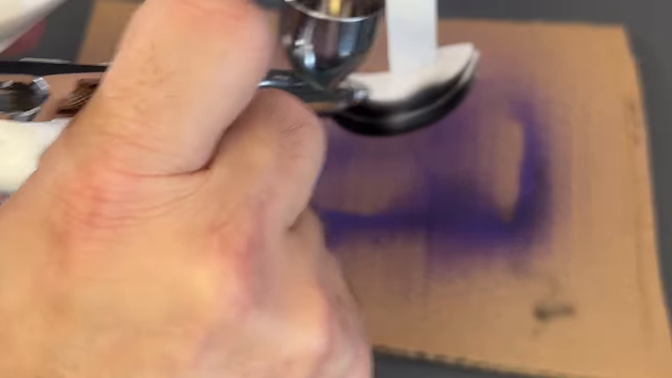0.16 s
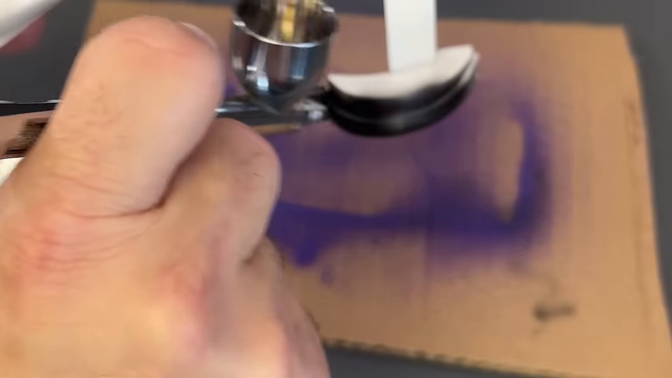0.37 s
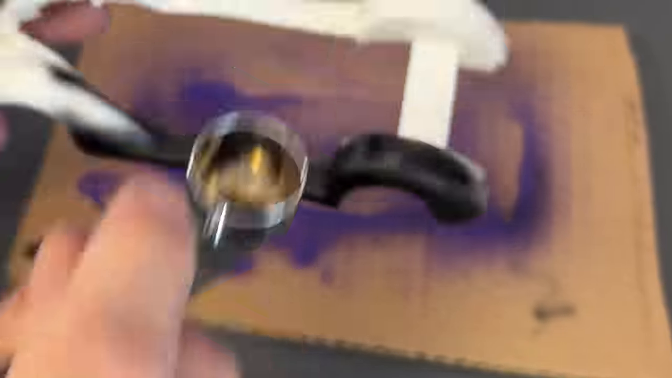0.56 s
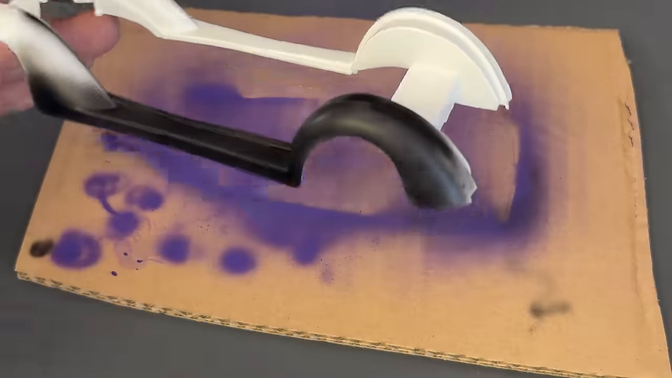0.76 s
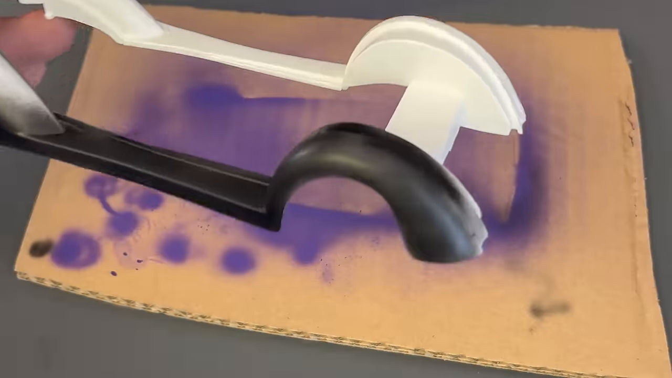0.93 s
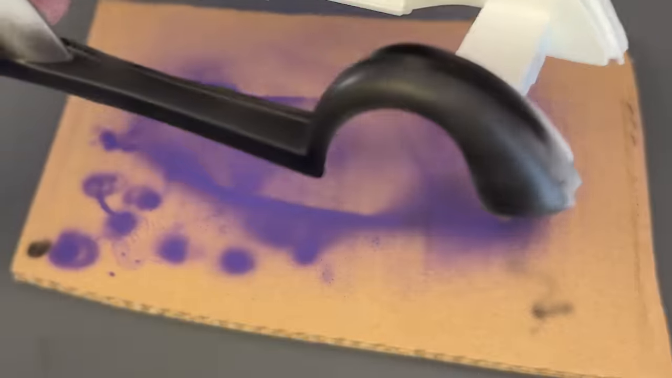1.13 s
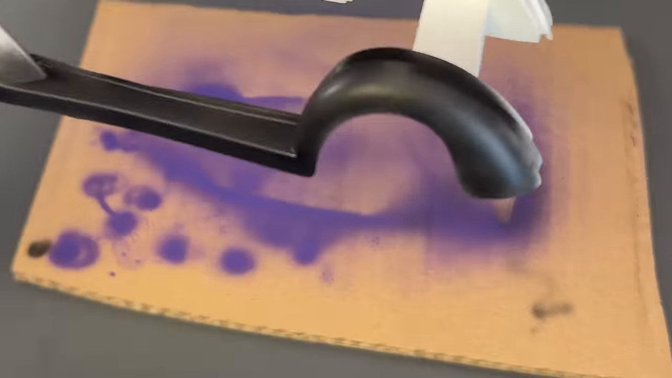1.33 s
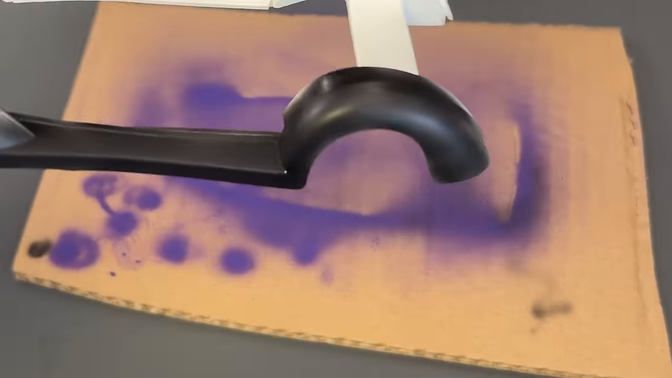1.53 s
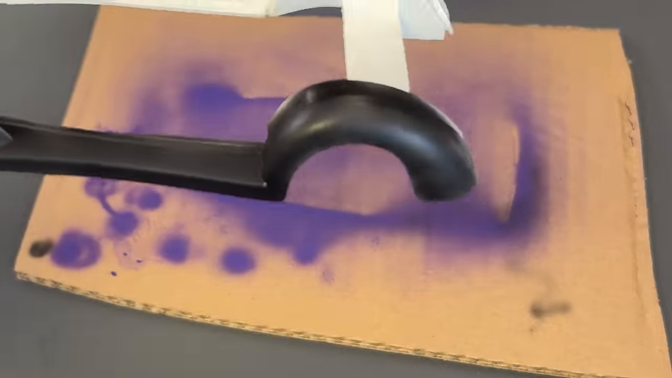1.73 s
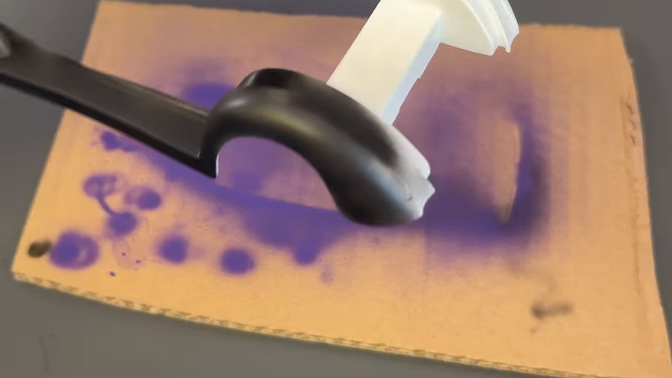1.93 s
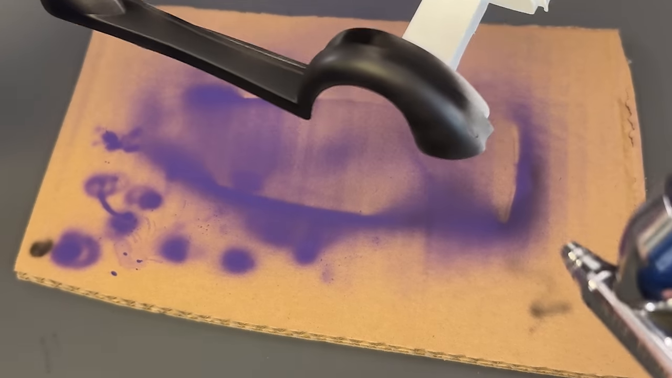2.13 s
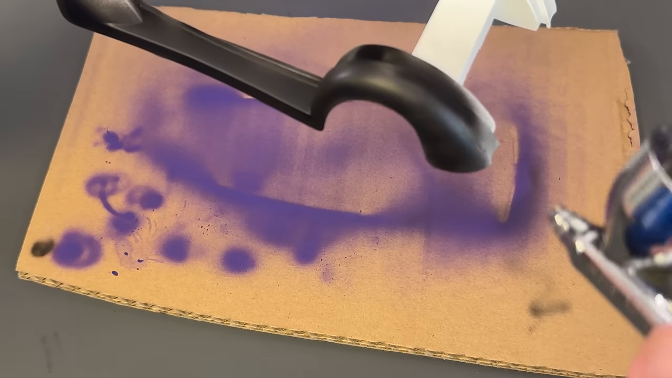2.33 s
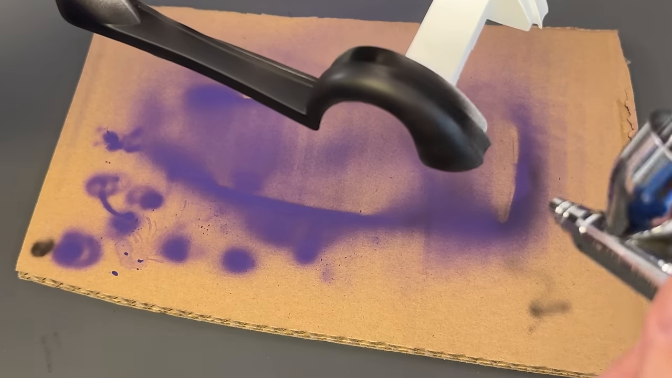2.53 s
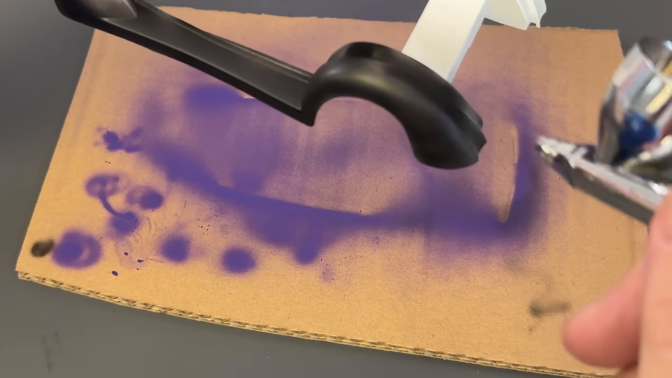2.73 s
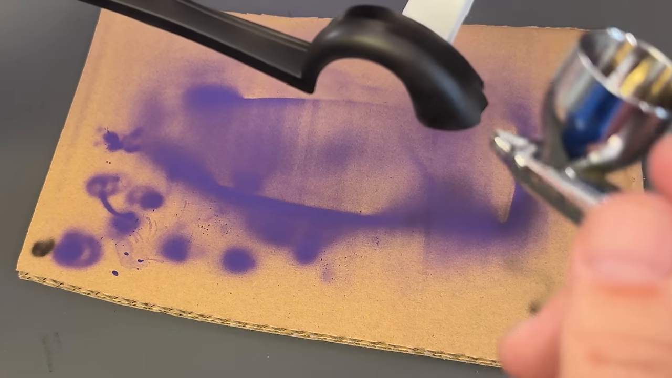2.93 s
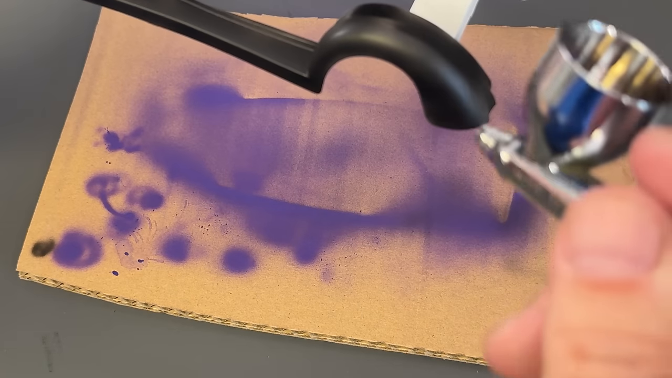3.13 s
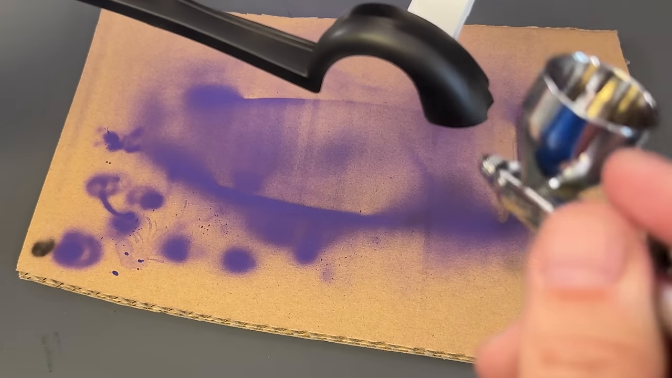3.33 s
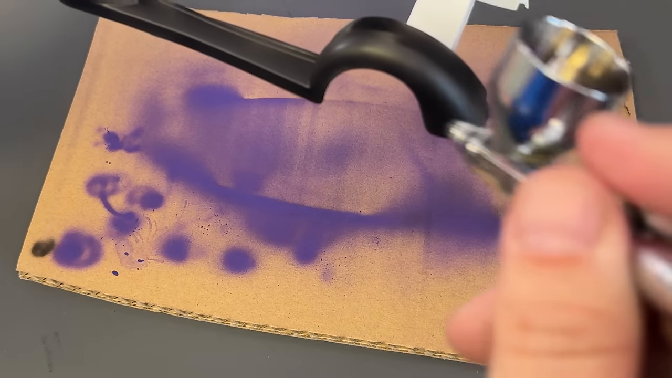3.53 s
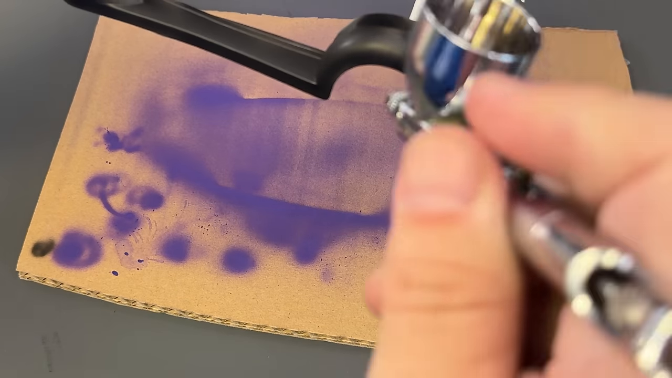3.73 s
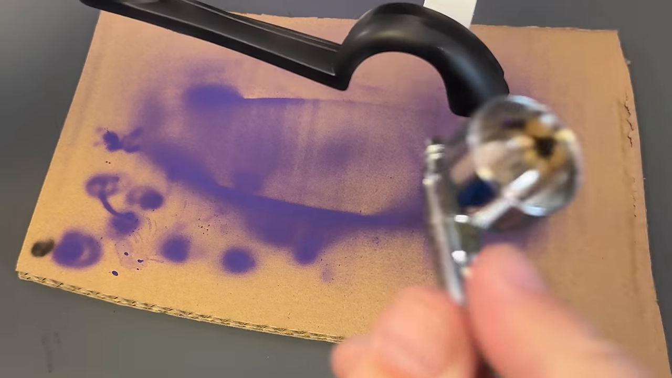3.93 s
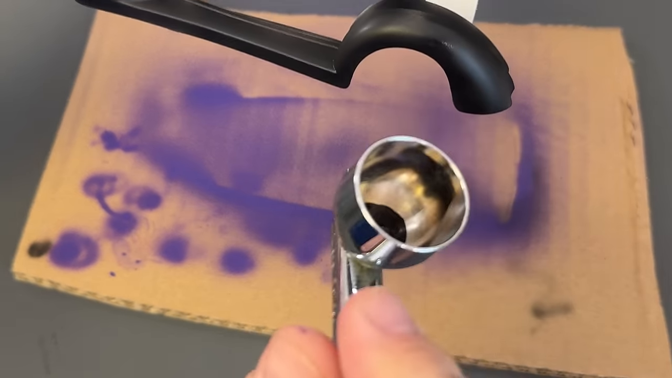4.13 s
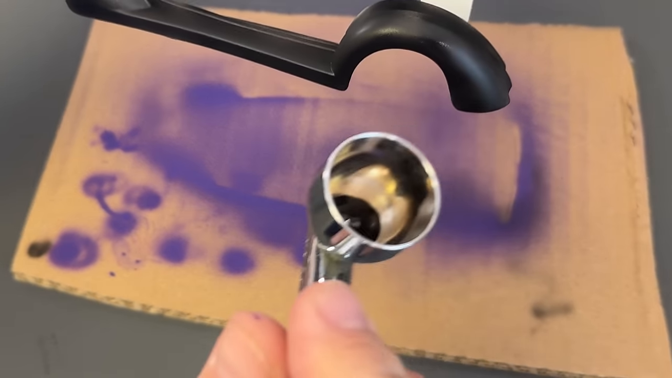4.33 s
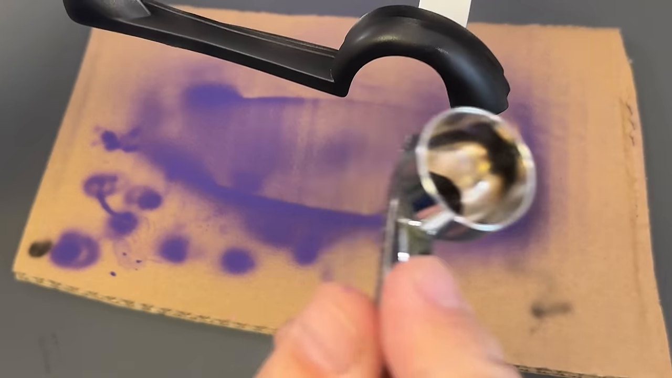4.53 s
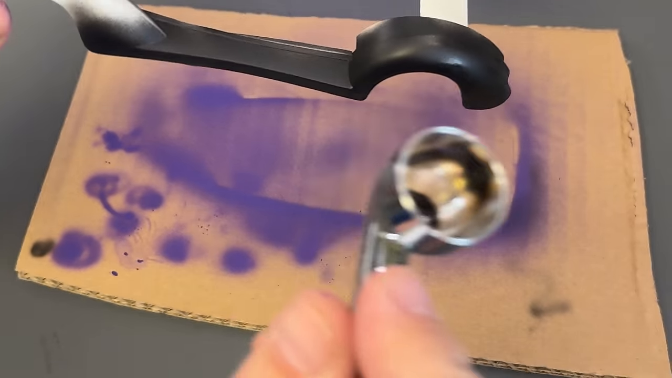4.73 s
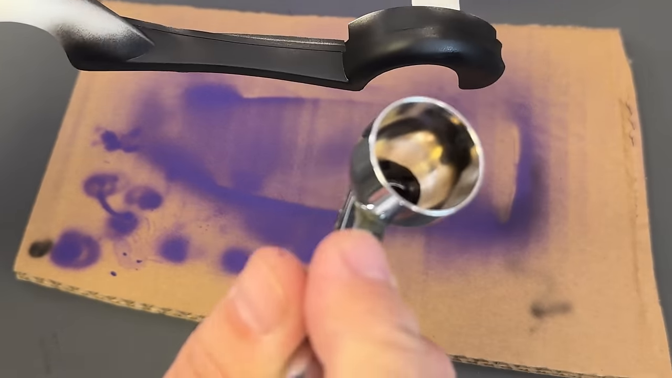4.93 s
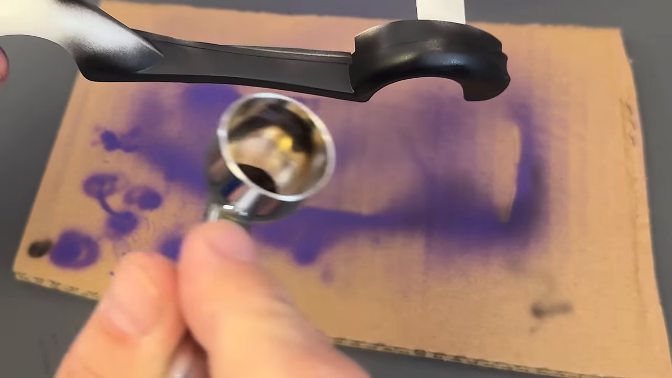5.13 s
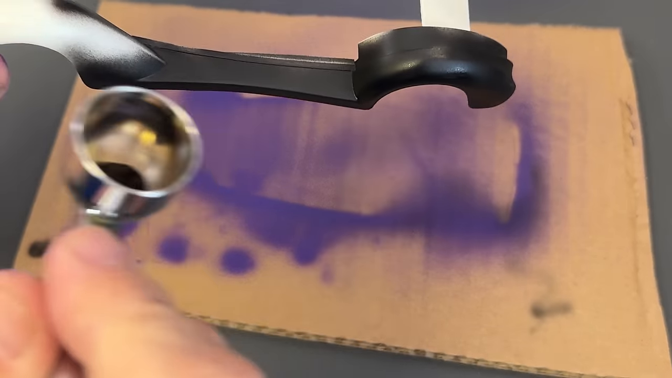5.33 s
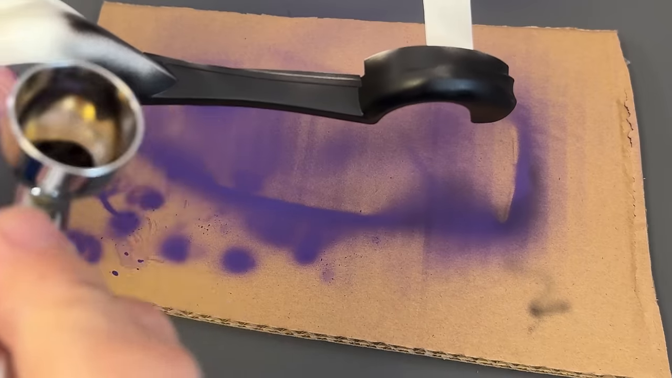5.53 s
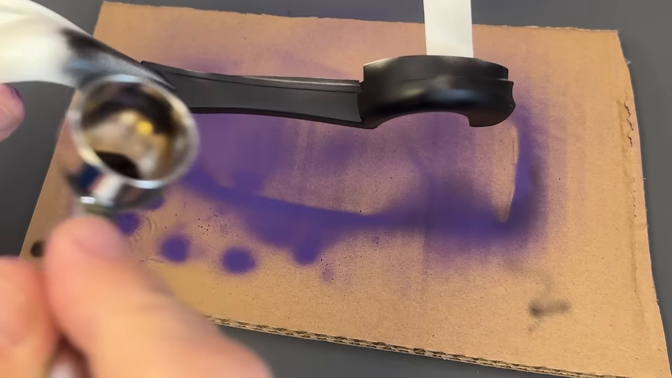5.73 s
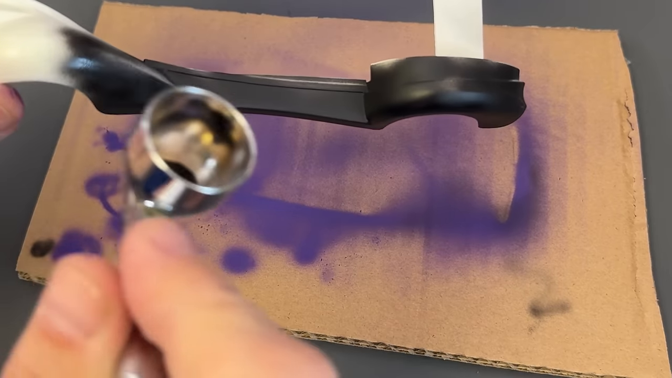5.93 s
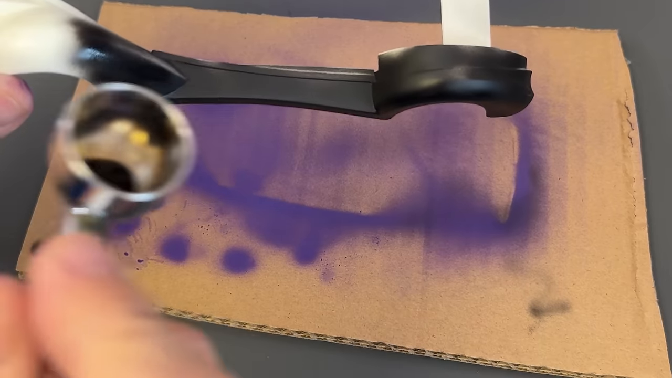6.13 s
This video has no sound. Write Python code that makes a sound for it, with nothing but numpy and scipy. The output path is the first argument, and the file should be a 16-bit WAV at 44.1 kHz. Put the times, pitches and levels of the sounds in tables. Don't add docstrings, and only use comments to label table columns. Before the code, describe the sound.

Two spells of bright, breathy spray hiss on a small plastic part, split by a valve click and a pause of steady motor whine.

```python
import sys
import numpy as np
from scipy import signal
from scipy.fft import rfft, irfft, next_fast_len
from scipy.io import wavfile
from scipy.ndimage import uniform_filter1d

SR = 44100
rng = np.random.default_rng(int(sys.argv[2]) if len(sys.argv) > 2 else 0)


def gain_from_db(level_db):
    decades = np.asarray(level_db, float) / 20
    return 10 ** decades


def transcribe(signal):
    frames = np.atleast_2d(signal).T
    limited = np.clip(frames, -1, 1)
    pcm = np.round(limited * 32767).astype(np.int16)
    wavfile.write(sys.argv[1], SR, pcm)


N = 277389
HZ = np.maximum(np.arange(N // 2 + 1) * SR / N, 1)
PORT_SHARE = 0.63
# f/Hz, side minus mid/dB
BRIGHT_SIDE = [(500, -12), (1200, -13), (2100, -12), (2900, -14), (3600, -9), (4300, -14), (5900, -24),
               (6400, -8.5), (8500, -12), (10300, -11), (10800, -25), (14300, -22), (15000, -9.5),
               (16000, -6)]


def rms_one(x):
    return x / np.sqrt(np.mean(x ** 2) + 1e-20)


def in_time(rows):
    s, *columns = np.transpose(rows)
    return [np.interp(np.arange(N) / SR, s, c) for c in columns]


def at_hz(points, hz):
    point_hz, point_db = np.transpose(points)
    return np.interp(np.log(hz), np.log(point_hz), point_db)


def drift(rate):
    r = np.exp(-80 * np.pi * rate / SR)
    slow = signal.lfilter([1], [1, -2 * r, r * r], rng.standard_normal(N // 40 + 2002))[2000:]
    return np.interp(np.arange(N) / 40, np.arange(len(slow)), rms_one(slow))


def resonate(x, hz, width_hz):
    r = np.exp(-np.pi * width_hz / SR)
    return signal.lfilter([1, 0, -1], [1, -2 * r * np.cos(2 * np.pi * hz / SR), r * r], x)


def noise(spectrum, side_table):
    (first_hz, first_db), (last_hz, last_db) = spectrum[0], spectrum[-1]
    ends = [(first_hz / 2, first_db - 30)] + list(spectrum) + [(last_hz * 2, last_db - 40)]
    colour = gain_from_db(at_hz(ends, HZ)) * [np.ones(len(HZ)), gain_from_db(at_hz(side_table, HZ))]
    mid, apart = rfft(rng.standard_normal((2, N)))
    side = np.sqrt(PORT_SHARE) * 1j * mid + np.sqrt(1 - PORT_SHARE) * apart
    pair = irfft(np.array([mid, side]) * colour, N)
    return pair / np.std(pair[0])


def fan():
    # f/Hz, level/dB
    fan_tones = [(129.0, -64), (166.0, -75), (200.0, -69.5), (238.6, -61), (262.4, -58), (275.0, -66),
                 (325.2, -66), (838.0, -74)]
    # f/Hz, density/dB per Hz
    vent_colour = [(7500, -21), (10300, -7), (10750, 1.5), (11200, -3), (12000, -1), (13000, -9),
                   (13600, -1.5), (16000, -6)]
    now = np.arange(N) / SR
    tones = np.zeros(N)
    for hz, db in fan_tones:
        swell = gain_from_db(db + 2.5 + 1.5 * drift(1.4))
        tones += swell * np.sin(2 * np.pi * hz * now + .6 * drift(1.18))
    hiss = gain_from_db(-72 + 1.2 * drift(3.0)) * noise(vent_colour, BRIGHT_SIDE)
    return tones * [[1], [.07]] + hiss * [[1], [.8]]


def shade(multiple):
    hand_shade = dict([(14, -2.5), (15, 3), (19, 3), (23, -10.5), (27, 3.5), (28, -3.5), (29, -3), (31, 7),
                       (32, 6), (40, -7), (41, 5), (49, 7), (69, 12), (72, -13)])
    if multiple not in hand_shade:
        return 1
    moved = np.interp(np.arange(0, N, 64) / SR, (.9, 1.8), [-.5, .5])
    return np.repeat(gain_from_db(hand_shade[multiple] * moved), 64)[:N]


def motor_multiples():
    chosen = dict([(2, -9), (3, -5.5), (4, -9.5), (6, -12), (7, -14), (9, -11.5), (11, -14), (12, -9),
                   (13, -13.5), (14, -12), (15, -14.5), (16, -23), (18, -16.5), (19, -11.5), (20, -15),
                   (21, -15), (22, -17), (23, -16.5), (25, -19), (27, -23), (28, -19.5), (29, -17),
                   (33, -19), (36, -19), (37, -19), (38, -18), (43, -16), (45, -22), (65, -24), (72, -27),
                   (31, -31), (32, -28), (39, -29), (40, -21), (41, -25), (46, -35), (47, -26), (48, -36),
                   (50, -26), (58, -29), (60, -31), (62, -28), (67, -31), (69, -28), (70, -28), (17, -28),
                   (24, -28), (26, -28), (30, -31), (34, -27), (35, -27), (51, -42), (52, -34), (53, -42),
                   (54, -32), (55, -41), (56, -40), (57, -38), (59, -40)])
    faint_db, fall_db, scatter_db = -22.5, 0.2, 4
    scatter = rng.standard_normal(73)
    return [(k, chosen.get(k, faint_db - fall_db * k + scatter_db * scatter[k])) for k in range(1, 73)]


def compressor():
    # f/Hz, width/Hz, level/dB
    housing = [(91.3, 15, -65), (129.4, 14, -69), (238.7, 5.9, -66.5), (263.4, 10.7, -62.5),
               (1122, 23, -77), (1830, 45, -74.5), (3085, 13, -81), (3430, 40, -91), (4090, 50, -75.5)]
    # f/Hz, density/dB per Hz
    air_colour = [(18, -54), (30, -33), (86, -8), (201, -5.5), (259, -7), (350, -11), (430, -8),
                  (520, -14.5), (600, -10), (670, -17), (747, -11.5), (980, -22.5), (1120, -18),
                  (1350, -24.5), (1930, -30.5), (2710, -22.5), (2890, -32), (4700, -35), (6110, -70),
                  (10300, -120)]
    # f/Hz, side minus mid/dB
    air_side = [(60, -48), (130, -16.5), (290, -14), (640, -7), (1410, 5.5), (3100, 1), (6820, -11),
                (15000, -33)]
    # f/Hz, density/dB per Hz
    upper_air = [(2760, -42), (4700, -17), (5620, 1), (6100, -15), (6660, -9), (6950, -3), (7230, -6),
                 (8010, -17)]
    # t/s, level/dB
    song_level = [(0, -77), (.75, -72), (1.0, -66), (6.29, -62)]
    motor_hz, song_multiple = 62.93, 42
    turn = 2 * np.pi * np.cumsum(motor_hz * (1 + 0.0004 * drift(1.37))) / SR
    waver = [gain_from_db(1.35 * drift(3.2)) for _ in range(7)]
    whine = np.zeros(N)
    for i, (k, db) in enumerate(motor_multiples()):
        tone = np.sin(k * turn + rng.uniform(0, 2 * np.pi))
        whine += gain_from_db(db) * shade(k) * waver[i % 7] * tone
    song = gain_from_db(in_time(song_level)[0]) * np.sqrt(waver[0]) * np.sin(song_multiple * turn)
    body = song * [[1], [-.45]]
    for hz, width_hz, db in housing:
        shake = rng.standard_normal((2, N))
        for _ in range(2):
            shake = resonate(shake, hz, 1.4 * width_hz)
        power = uniform_filter1d(shake ** 2, round(3 * SR / hz), axis=1)
        swell = np.sqrt(power / np.mean(shake ** 2) + .02)
        shake = shake / swell ** .4
        side_gain = gain_from_db(at_hz(air_side, hz) - 3.0)
        body = body + gain_from_db(db) * shade(round(hz / motor_hz)) * rms_one(shake) * [[1], [side_gain]]
    air = gain_from_db(-55.5) * noise(air_colour, air_side)
    air += gain_from_db(-75 + 0.71 * drift(2.7)) * noise(upper_air, BRIGHT_SIDE)
    return gain_from_db(-56) * whine * [[1], [.1]] + body + air


def controls():
    # opens t/s, shuts t/s
    trigger = [
        (-1.0, .539),
        (2.111, 7.0),
    ]
    # t/s, strike level/dB, brightness/dB
    strike = [(0.0, -48.5, 0.5), (0.53, -46.5, -1.2), (2.13, -44.5, 0), (2.18, -62, 3), (2.238, -59, 1),
              (2.258, -44.6, -2), (2.6, -44.5, 3.5), (2.85, -49, 6), (3.05, -44, 4.5), (3.45, -42.0, 4.5),
              (3.85, -37.0, 1), (4.15, -40.5, -0.5), (4.545, -38.5, 0), (4.6, -48, -2.3),
              (4.88, -39.5, -3.5), (5.13, -46.5, 0), (5.5, -43.5, -5), (6.29, -43.5, -0.5)]
    # t/s, change/dB, spread/s, brightness/dB
    crossings = [(0.192, -2.5, 0.023, 5), (0.231, 5.5, 0.026, 0), (0.295, 3, 0.011, -0.2),
                 (0.523, 4.5, 0.0073, -2), (2.273, 0.5, 0.007, 4.5), (2.76, 2.5, 0.011, 1),
                 (2.848, 3, 0.007, 2), (2.911, 3.2, 0.007, 2), (2.951, 4.5, 0.026, -4),
                 (3.031, 0.5, 0.007, 5), (3.139, 6, 0.013, -3.5), (3.291, 5.0, 0.017, -4),
                 (3.458, 5.5, 0.016, -3.5), (3.646, 1, 0.007, 3), (3.877, 3.5, 0.011, -1.5),
                 (4.085, 3, 0.014, -1), (4.252, 1.5, 0.011, -0.1), (4.715, 2, 0.017, -4.5),
                 (4.991, 3, 0.006, -2), (5.04, 1.5, .018, -1.5), (5.294, 4.0, 0.042, -0.5),
                 (5.398, 3.5, 0.014, 2.8), (5.541, 2.5, 0.026, 1.3), (5.893, 0.5, 0.017, 3),
                 (6.22, 3.1, 0.018, 1.5), (3.44, 1.5, .008, .6), (5.94, 1.2, .012, .6), (.44, 1.5, .012, 0),
                 (5.02, 0, .01, 1.5), (4.06, 1.5, .01, -2.2)]
    # t/s, change/dB, spread/s, brightness/dB
    slips = [(2.329, -1, 0.007, -3), (2.295, -2.5, .007, 0.5), (2.409, -5.5, 0.011, -5),
             (2.565, -4, 0.0037, 0), (2.488, 1.8, 0.028, -7.5), (2.644, -1, 0.02, -3.5),
             (2.866, -7, 0.007, -3), (2.887, -7.5, 0.009, -4.5), (3.378, -3.5, 0.021, 1),
             (3.594, 2.5, 0.014, -7), (3.686, -3.5, 0.012, -0.5), (3.738, 1, 0.015, -4),
             (3.825, -6, 0.012, -1.8), (3.945, -2, 0.018, -5.5), (4.288, -2.0, 0.011, -1.5),
             (4.4, -3.5, 0.028, 2), (4.568, -2, 0.013, -2), (4.659, -3.6, 0.013, 0),
             (4.935, -2.5, 0.017, 0), (5.1, -0.8, 0.03, -3.5), (5.661, -2, 0.026, 0.5),
             (5.821, 0, 0.026, -2), (6.1, 0, 0.02, -2.3), (5.455, -1.5, .012, -1.5),
             (2.625, -.6, .01, -1.5), (4.74, -1.5, .01, 0), (4.39, 0, .015, -1.5)]
    open_s, shut_s = 0.018, 0.0075
    now = np.arange(N) / SR
    held = np.zeros(N)
    for opens, shuts in trigger:
        held += np.clip(np.minimum((now - opens) / open_s, (shuts - now) / shut_s), 0, 1) ** 2
    strike_db, bright_db = in_time(strike)
    cross_db, shine_db = np.zeros((2, N))
    for s, change, spread, shine in [*crossings, *slips]:
        near = slice(max(round((s - 4 * spread) * SR), 0), round((s + 4 * spread) * SR))
        bell = np.exp(-.5 * ((now[near] - s) / spread) ** 2)
        cross_db[near] += change * bell
        shine_db[near] += shine * bell
    return held, strike_db, bright_db + shine_db, cross_db, shine_db


def wash():
    # t/s, level/dB
    spill = [(0, -61.5), (.5, -60.5), (2.13, -70), (2.23, -70), (2.3, -58), (2.9, -64), (3.5, -62),
             (3.9, -52), (4.6, -52), (5.1, -59), (5.5, -54), (6.29, -56.5)]
    # f/Hz, density/dB per Hz
    wash_colour = [(330, -8), (450, -6), (650, -1), (850, -0.5), (1100, -6)]
    held = controls()[0]
    return held * gain_from_db(in_time(spill)[0] + 2.6 * drift(5.4)) * noise(wash_colour, BRIGHT_SIDE)


def leak():
    # t/s, level/dB
    leak_level = [
        (.54, -63),
        (.6, -69),
        (.85, -69),
        (1.1, -74),
        (1.78, -74),
        (1.86, -67.5),
        (1.96, -62.5),
        (2.12, -65),
        (2.2, -70),
    ]
    # f/Hz, density/dB per Hz
    leak_colour = [(2350, -41), (4000, -17), (4240, -7), (5250, -3), (6110, -4), (6860, -8.5),
                   (13800, -4.5), (16000, -3)]
    return gain_from_db(in_time(leak_level)[0]) * noise(leak_colour, BRIGHT_SIDE) * [[1], [.85]]


def valve():
    # t/s, peak level/dB
    snaps = [
        (.55728, -21),
    ]
    # f/Hz, level/dB, t60/s
    valve_modes = [(3800, -20, .0045), (6100, -19, .009), (6630, -5.5, .008), (7316, -11, .032),
                   (8200, -14, .003), (9500, -7, .009), (10400, -9, .007), (12630, -6, .0065),
                   (13600, -14, .005), (15100, -12, .003)]
    out, age = np.zeros(N), np.arange(2000) / SR
    bright = signal.butter(4, 4300, "high", fs=SR, output="sos")
    for s, peak_db in snaps:
        snap = gain_from_db(-13 - 60 * age / 0.0051) + gain_from_db(-18 - 60 * age / 0.049)
        knock = snap * rng.standard_normal(len(age))
        knock[0] += gain_from_db(3.5)
        for hz, level_db, t60 in valve_modes:
            knock += gain_from_db(level_db - 60 * age / t60) * np.sin(2 * np.pi * hz * age)
        out[round(s * SR):][:len(age)] += gain_from_db(peak_db - 5.0) * signal.sosfilt(bright, knock)
    return out * [[1], [.15]]


def whistles():
    # t/s, f/Hz, level/dB, spread/s
    whistle_puffs = [(.24, 2300, -46, .015), (.4, 3020, -46, .012), (.522, 1500, -43, 0.0055),
                     (.69, 5900, -73, .03), (1.85, 6300, -73, .015), (1.885, 5700, -71, .02),
                     (1.93, 5250, -71, .03), (2.03, 6000, -69, .03), (2.375, 7300, -52, .012),
                     (2.44, 7400, -52, .01), (2.586, 4800, -42, 0.0046), (2.588, 7600, -47, .006),
                     (2.845, 7500, -43, .006), (2.913, 7500, -41, .006), (3.78, 3800, -40, 0.013),
                     (4.1, 10400, -55, .01), (4.35, 10500, -45, .01), (4.48, 10600, -43, 0.021),
                     (4.83, 6450, -49.5, .025), (5.39, 3870, -43, .012), (5.54, 9700, -50, .02),
                     (5.72, 9900, -54, .012), (2.79, 15300, -45, .022), (3.39, 15300, -46, .02),
                     (3.69, 15200, -49, .018), (4.86, 15300, -47, .02), (5.22, 15000, -48, .015),
                     (5.81, 11500, -50, .02), (6.16, 10000, -51, .015)]
    width_hz = 570
    out, age = np.zeros(N), np.arange(-4000, 4000) / SR
    for s, hz, db, spread in whistle_puffs:
        puff = rng.standard_normal(len(age))
        tone = rms_one(resonate(resonate(puff, hz, width_hz), hz, width_hz))
        bell = np.exp(-.5 * (age / spread) ** 2)
        out[round((s + age[0]) * SR):][:len(age)] += gain_from_db(db) * bell * tone
    return out * [[1], [.12]]


def moments():
    # from t/s, delay/ms, signed gain, delay/ms, signed gain
    postures = [(0.0, .214, -.12, 0.27, 0.14), (2.12, 0.31, -0.094, 0.39, -.05),
                (2.5, 0.3, -0.032, 0.4, 0.028), (2.92, 0.88, 0.058, .988, 0.047),
                (3.25, 0.33, -0.1, 0.47, .1), (3.58, 0.33, -0.19, 0.4, 0.09),
                (3.95, 0.32, -0.15, 0.34, -0.19), (4.3, 0.3, -0.14, 0.33, -0.11),
                (4.6, 0.3, -.11, 0.5, -0.18), (4.75, 0.31, -0.13, 0.5, -0.11),
                (5.0, 0.25, -0.11, .299, -0.13), (5.17, 0.31, -0.056, .37, -0.045),
                (5.42, 0.37, -.09, .445, -0.14), (5.85, 0.4, -.1, 0.46, -0.13)]
    # t/s, turn 0-1
    rim_turn = [
        (2.9, 0),
        (3.3, 0.14),
        (3.5, .3),
        (3.72, 0.95),
        (4.1, 1),
        (4.6, 1.0),
    ]
    # unturned f/Hz, turned f/Hz, width/Hz, unturned level/dB, turned level/dB
    ridges = [(3230, 2940, 390, -2, -5), (8370, 9050, 600, -8, -7), (9700, 10300, 750, 2, 4.5),
              (10620, 11100, 350, -5.5, -4.5)]
    step_s = .1
    steps = []
    for posture, end in zip(postures, [row[0] for row in postures[1:]] + [N / SR]):
        start = posture[0]
        if not 2.8 < start < 4.5:
            steps.append((start, posture, []))
            continue
        for s in np.linspace(start, end, round((end - start) / step_s), endpoint=False):
            u = np.interp(s + step_s / 2, *np.transpose(rim_turn))
            rim = [(f + u * (g - f), width, d + u * (e - d)) for f, g, width, d, e in ridges]
            steps.append((s, posture, rim))
    return steps


def echoes(x):
    # from t/s, until t/s, f/Hz, width/Hz, level/dB
    hollows = [(-1, 1, 3350, 760, 3.4), (-1, 1, 4040, 700, -4.9), (-1, 1, 13840, 150, -5.6),
               (-1, 1, 1450, 250, 3.1), (-1, 1, 8500, 4000, -1.5), (2, 5.2, 5260, 310, 2.4),
               (2, 4.58, 5650, 320, -3.7), (2.4, 4.2, 6780, 130, -5.3), (2, 2.8, 8450, 450, -4),
               (2, 2.8, 3220, 550, -2.2), (2.4, 3.9, 7600, 700, 2), (2, 2.8, 6220, 250, -2.5),
               (2.8, 3.5, 13230, 450, -7.2), (4.5, 5.2, 2930, 450, -3.5), (2.4, 2.8, 9580, 300, -2.5),
               (4.7, 5.1, 3750, 350, -3.5), (5.1, 5.2, 3400, 300, -3), (5.1, 5.2, 6300, 900, 2.5),
               (5.2, 7, 6200, 800, 5), (5.2, 7, 11290, 220, -3.7), (4.5, 7, 7280, 500, -3),
               (5.2, 7, 14810, 370, 2.5), (5.2, 7, 2890, 340, -3.8), (5.2, 7, 4220, 950, 5.2),
               (5.2, 7, 8700, 4000, -2.5), (4.5, 5.1, 8700, 1500, -1.5), (5.2, 7, 9900, 900, 1),
               (2.2, 3.7, 15450, 600, 3), (2.2, 3.7, 14600, 500, -2.5), (2.8, 3.4, 7235, 300, 3),
               (2.8, 3.4, 13900, 600, 2), (3.2, 3.7, 10850, 400, -2.5), (3.2, 4.2, 4900, 400, -1.5),
               (3.2, 4.2, 3950, 500, 1.5), (5.1, 5.6, 8960, 350, -2.5), (4.2, 4.5, 13400, 1200, -1.5),
               (-1, 1, 10680, 300, 3), (-1, 1, 11200, 500, -2), (-1, 1, 9800, 500, -2),
               (3.5, 4.5, 8650, 300, -2), (2.8, 4.5, 5550, 150, -2.5), (2.8, 4.5, 5250, 250, 1.5),
               (2.8, 3.9, 6850, 250, -1.5)]
    out, now = np.zeros_like(x), np.arange(N) / SR
    pad, fade_s = 2048, .06
    steps = moments()
    for (s, posture, rim), end in zip(steps, [step[0] for step in steps[1:]] + [N / SR]):
        a, b = max(round(s * SR) - pad, 0), min(round(end * SR) + pad, N)
        size = next_fast_len(b - a + pad)
        hz = np.arange(size // 2 + 1) * SR / size
        paths = 1
        for ms, gain in zip(posture[1::2], posture[2::2]):
            paths = paths + gain * np.exp(-2j * np.pi * hz * ms / 1000)
        facing = [row[2:] for row in hollows if row[0] < posture[0] < row[1]] + rim
        colour_db = sum(db / (1 + (2 * (hz - top_hz) / width_hz) ** 2) for top_hz, width_hz, db in facing)
        heard = irfft(rfft(x[:, a:b], size) * paths * gain_from_db(1.15 * colour_db), size)[:, :b - a]
        fade_in = np.clip((now[a:b] - s) / fade_s + .5, 0, 1) if s > 0 else 1
        fade_out = np.clip((end - now[a:b]) / fade_s + .5, 0, 1) if end < N / SR else 1
        out[:, a:b] += heard * fade_in * fade_out
    return out


def jet():
    # f/Hz, density/dB per Hz
    roar_colour = [(300, -32), (600, -17), (1100, -3), (1600, 0), (2300, 0), (3000, -3), (4200, -15)]
    splash_colour = [(2000, -15), (3000, -3), (4000, 0), (5200, 0), (6200, -3), (8000, -15)]
    sizzle_colour = [(4800, -15), (6200, -3), (7500, 0), (9500, 0), (11000, -3), (13000, -15)]
    nozzle_colour = [(9000, -15), (11000, -3), (12500, 0), (14000, 0), (15500, 4), (16500, 4)]
    # t/s, roar toward the left/dB, extra roar width/dB, extra upper sizzle width/dB
    aim = [(0, 0.5, -4, -9), (.54, 0, -5, -9), (2.2, 0, -4, -8), (2.72, 0, -5, -7), (2.95, -0.5, -13, 1.2),
           (3.55, 0, -12, .6), (3.68, 0, -11, .6), (3.75, 0.6, -1.5, .6), (3.83, 0, -13, .6),
           (4.06, 1.2, -1.5, .6), (4.24, 1.5, -.6, .6), (4.3, .6, -7, .6), (4.4, 1.5, -1.5, .6),
           (4.52, 1.2, -1.5, .6), (4.6, 0, -9, -4), (5.2, 1.5, -3.5, -5), (5.45, 2.5, 1.1, -11),
           (6.29, 2.1, 0, -10.5)]
    # t/s, level/dB
    flow = [(0, -44.5), (2.13, -46), (2.235, -45), (2.27, -44.5), (2.5, -43), (2.78, -41.5), (2.9, -42.5),
            (3.35, -39.5), (3.7, -44), (4.2, -42), (5.2, -43), (5.45, -40.5), (6.1, -42), (6.23, -40)]
    held, strike_db, bright_db, cross_db, shine_db = controls()
    roar_db, nozzle_db = strike_db + cross_db, in_time(flow)[0]
    left_db, width_db, high_width_db = in_time(aim)
    flutter = drift(9.7)

    low = gain_from_db(roar_db + 0.2 * flutter + 0.13 * drift(23)) * noise(roar_colour, BRIGHT_SIDE)
    splash = gain_from_db(roar_db + bright_db - 1.5 + 0.39 * flutter + 0.83 * drift(22))
    low += splash * noise(splash_colour, BRIGHT_SIDE)
    low[1] = low[1] * gain_from_db(width_db) + low[0] * np.tanh(left_db * np.log(10) / 40)

    sizzle = gain_from_db(roar_db + 1.26 * bright_db - 4.0 + 0.48 * flutter + 1.0 * drift(24))
    skirt = gain_from_db(nozzle_db - 10.5)
    high = np.hypot(sizzle, skirt) * noise(sizzle_colour, BRIGHT_SIDE)
    edge_db = 0.23 * (cross_db + shine_db)
    nozzle = gain_from_db(nozzle_db + edge_db + .4 * flutter + 0.5 * drift(40))
    high += nozzle * noise(nozzle_colour, BRIGHT_SIDE)

    size = next_fast_len(N)
    hz = np.arange(size // 2 + 1) * SR / size
    upper = irfft(rfft(high[1], size) * (hz > 8900) * (hz < 12000), size)[:N]
    rest = high[1] - upper
    high[1] = upper * gain_from_db(high_width_db) + rest * gain_from_db(.2 * high_width_db)
    return echoes(held * (low + high))


def scene():
    mid, side = fan() + compressor() + wash() + leak() + valve() + whistles() + jet()
    return np.array([mid + side, mid - side]) * gain_from_db([[.1], [-.1]])


def low_pass(x):
    return signal.sosfilt(signal.butter(12, 17100, fs=SR, output="sos"), x)


def record(dry):
    steep = signal.ellip(18, .5, 90, 15735, fs=SR, output="sos")
    mix = signal.sosfilt(steep, dry)
    return low_pass(mix)


dry = scene()
out = record(dry)
transcribe(out)
```